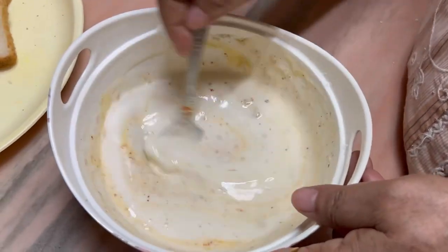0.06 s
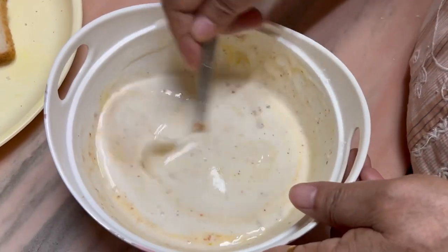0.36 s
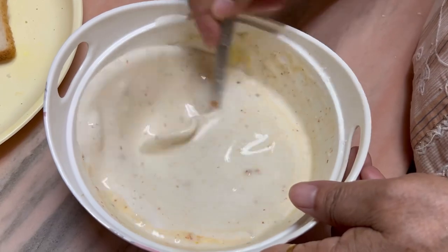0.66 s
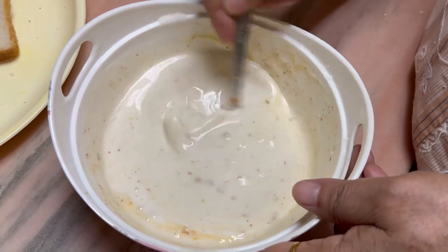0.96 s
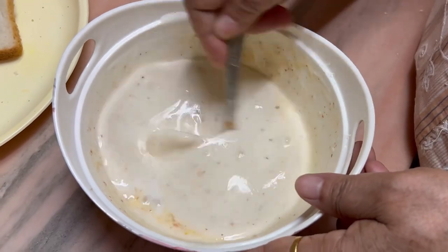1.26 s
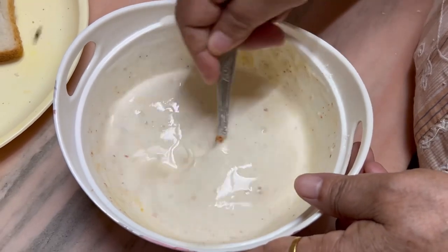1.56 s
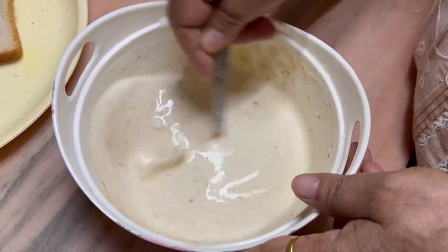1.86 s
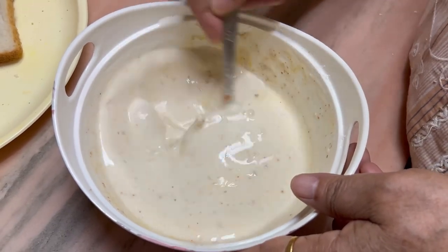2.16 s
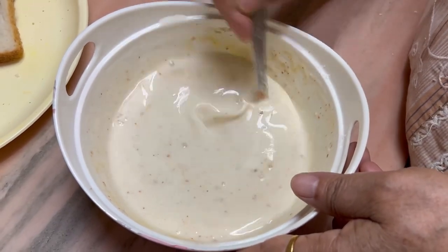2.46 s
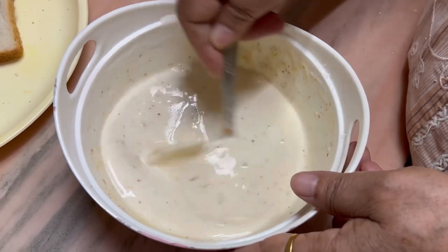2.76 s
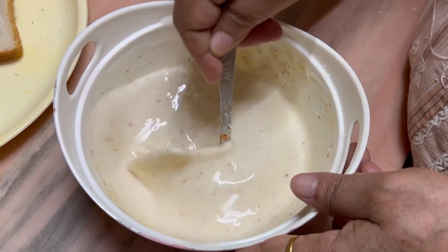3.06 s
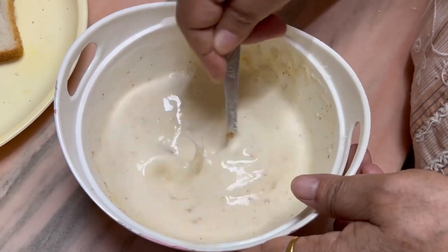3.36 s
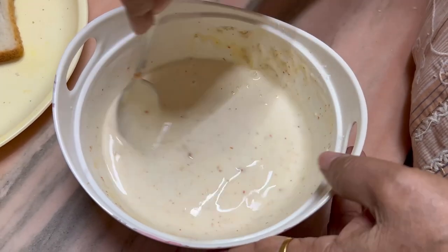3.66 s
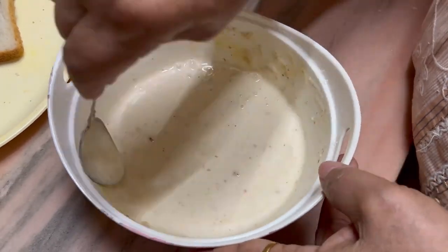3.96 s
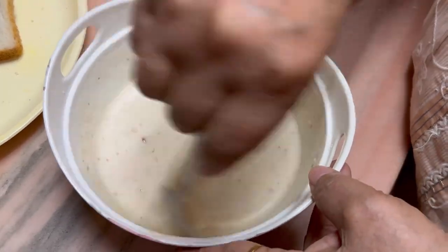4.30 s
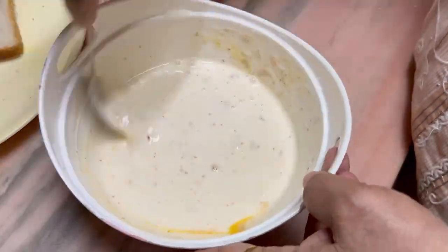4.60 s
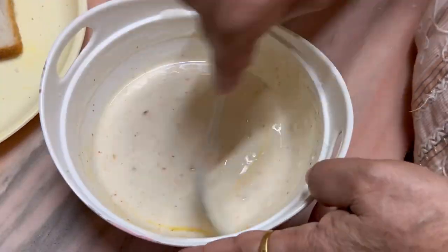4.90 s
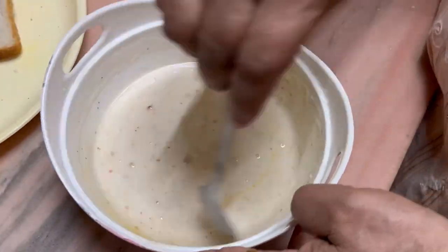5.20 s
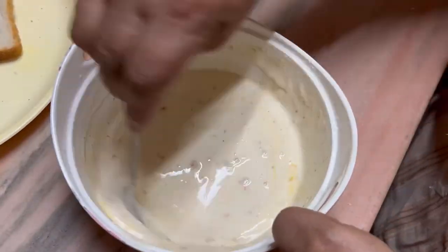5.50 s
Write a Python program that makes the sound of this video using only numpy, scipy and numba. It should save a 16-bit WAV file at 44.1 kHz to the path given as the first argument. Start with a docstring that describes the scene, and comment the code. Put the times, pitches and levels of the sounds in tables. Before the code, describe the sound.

Heard up close in a quiet room, a metal spoon clacks quickly and evenly against a plastic bowl, some strokes harder than others, while runny batter gulps and crackles stickily around it. The beating then gives way to a series of quieter, gritty scrapes along the bowl's wall, dotted with light taps and one sharp tick. A faint hum lies underneath the whole time.

```python
"""Beating batter in a plastic bowl

A quiet room, the microphone close to a hand-held bowl. A metal spoon beats thin batter, and each stroke
knocks the wall: a short clack, then the bowl's crowded, quickly damped modes. The batter gulps and smacks.
Later the spoon scrapes the sides in gritty sweeps. A faint hum lies underneath."""
import sys
import numpy as np
from scipy import signal
from scipy.fft import rfft, irfft, next_fast_len
from scipy.io import wavfile
from numba import njit

SR = 44100
rng = np.random.default_rng(int(sys.argv[2]) if len(sys.argv) > 2 else 0)


def store_pcm(level_fs):
    """Save levels as 16-bit WAV."""
    pcm = np.round(np.clip(level_fs, -1, 1) * 32767).astype(np.int16)
    wavfile.write(sys.argv[1], SR, np.atleast_2d(pcm).T)


N = 253134
TIME = np.arange(N) / SR
RING_TIME = TIME[:SR // 3]  # time axis of one short event

# Spoon on bowl, about seven beats a second, some touching twice. Columns: t/s, relative ring level/dB,
# bare-metal treble against the ring/dB, relative clack level/dB, contact f/Hz, strongest wall mode f/Hz
KNOCKS = [(0.098, -77, -15, -67, 2590, 1410), (0.122, -67, -24, -82, 1240, 1206),
          (0.264, -47.5, -33, -69, 1750, 1220), (0.411, -71.5, -40, -54.5, 1340, 1390),
          (0.553, -40, -13, -48, 1540, 1300), (0.692, -41, -10, -34.5, 1700, 1100),
          (0.844, -44.5, -17, -71, 2040, 1110), (0.871, -55, -14.5, -33, 3000, 1110),
          (0.986, -40.5, -21, -32, 2370, 1390), (1.135, -38, -14.5, -43, 1850, 1290),
          (1.288, -41.5, -13, -58, 1500, 1290), (1.341, -46, -17, -42.5, 1790, 1210),
          (1.461, -54.5, -6.5, -47.5, 1410, 1430), (1.48, -39.5, -16, -26.5, 1250, 1130),
          (1.619, -48, -19, -55, 2335, 1100), (1.723, -42.5, -2.5, -35.5, 1760, 1600),
          (1.752, -41, -10.5, -30, 1530, 1060), (1.897, -48.5, -25, -56, 1130, 1136),
          (2.038, -59, -7.5, -60, 2850, 1420), (2.063, -53, -15.5, -36.5, 1640, 1590),
          (2.099, -45.5, -3.5, -32, 2080, 1410), (2.194, -45.5, -16.5, -35, 2353, 1580),
          (2.347, -39, -23, -28, 2252, 1130), (2.404, -45.5, -6.5, -34.5, 2400, 1490),
          (2.528, -35.5, -1.5, -28.5, 3100, 1490), (2.651, -46, -11.5, -62, 1270, 1410),
          (2.684, -38.5, -10, -22.5, 2000, 1160), (2.795, -39, -13.5, -39, 1957, 1230),
          (2.949, -45.5, -12.5, -39.5, 1900, 1210), (3.091, -43.5, -8.5, -65, 1800, 1230),
          (3.239, -47, -14.5, -45.5, 1400, 1200), (3.393, -43, -13, -34.5, 1960, 1230),
          (3.539, -34.5, -11.5, -27, 2047, 1192), (3.771, -56, -9.5, -50, 2550, 1570),
          (4.006, -54, -5, -57, 2510, 1140), (4.153, -56.5, -20, -49.5, 2150, 1280),
          (5.715, -55, -6.5, -64, 2590, 1410)]
# Spectrum of the struck bowl: f/Hz, level/dB
BOWL_SPECTRUM = [(250, -39), (450, -30), (720, -22.5), (950, -11), (1120, -3.5), (1500, -6), (2000, -2),
                 (2950, -5), (3400, -14), (4500, -19.5), (7300, -19.5), (10500, -32), (13500, -41.5),
                 (16000, -60)]
# Spectrum of the scraping edge and the crackling batter: f/Hz, level/dB
GRIT_SPECTRUM = [(1500, -48.5), (3400, -16.5), (4500, -6.5), (5600, -3.5), (7500, 0), (9000, -3.5),
                 (12000, -5), (14000, -14), (16000, -35.5)]


def undb(db):
    """Decibels to amplitude."""
    return 10 ** (np.asarray(db) / 20)


def unit(x):
    """Scale to rms 1."""
    return x / np.sqrt(np.mean(x ** 2) + 1e-30)


def add(out, at_s, x):
    """Mix x into out from at_s on."""
    i = max(int(at_s * SR), 0)
    out[i:i + len(x)] += x[:max(N - i, 0)]


def shape(x, gain):
    """Filter by a gain that is a function of frequency."""
    return irfft(rfft(x) * gain(np.fft.rfftfreq(len(x), 1 / SR) + 1), len(x))


def noise(gain, samples=len(RING_TIME)):
    """White noise filtered by gain(f)."""
    return shape(rng.standard_normal(samples), gain)


def colour(hz, spectrum):
    """Gain at hz of a spectrum given as f/Hz, level/dB."""
    f, db = np.transpose(spectrum)
    return undb(np.interp(np.log(hz), np.log(f), db))


def drift(rate_hz):
    """Smooth random drift, spread near 1."""
    knots = rng.standard_normal(4096)
    return np.interp(TIME * rate_hz, np.arange(len(knots)), knots)


def fade(t60, t=RING_TIME):
    """Exponential decay, 60 dB in t60 seconds."""
    return np.exp(-np.log(1000) * t / t60)


@njit
def resonate(x, hz, width_hz):
    """State-variable band-pass with a moving centre."""
    y = np.empty(len(x))
    band_state, low_state = 0., 0.
    for i in range(len(x)):
        g = np.tan(np.pi * hz[i] / SR)
        damping = width_hz / hz[i]
        band = (band_state + g * (x[i] - low_state)) / (1 + g * (g + damping))
        band_state = 2 * band - band_state
        low_state += 2 * g * band
        y[i] = damping * band
    return y


def room_tone(waver_db=2, hum_db=-1):
    """Low room noise and a wavering hum, perhaps a fan."""
    # Spectrum of the room noise: f/Hz, level/dB
    air_spectrum = [(20, -6), (40, -3), (65, 4), (110, -6), (200, -8.5), (350, -14), (580, -9.5),
                    (1000, -16), (2200, -19), (4000, -32), (8000, -36.5), (16000, -50.5)]
    # Course of noise and hum together: t/s, level/dB
    levels = [(0, -74), (.6, -69.5), (3.6, -68.5), (4.3, -70), (4.6, -78), (5.74, -76)]
    # Partials of the hum: f/Hz, relative level/dB
    partials = [(68.5, -9), (140, -6), (290, -12)]
    level_db = np.interp(TIME, *np.transpose(levels))
    air = unit(noise(lambda f: colour(f, air_spectrum), N)) * undb(drift(2.2))
    hum = sum(undb(db + waver_db * drift(4.6)) * np.sin(2 * np.pi * hz * TIME + .26 * drift(26))
              for hz, db in partials)
    return undb(level_db) * (air + undb(hum_db) * np.sqrt(2) * hum)


def reflections(x, tail_db=-25, t60=.16, echo_db=-7, echo_s=.0145, echo_top_hz=3000):
    """One dull reflection from a nearby wall and a weak tail."""
    t = TIME[:SR]
    tail = noise(lambda f: 1 / np.hypot(1, (f / 4500) ** 2), SR) * fade(t60, t) * (t > echo_s)
    out = undb(tail_db) * signal.fftconvolve(x, tail / np.linalg.norm(tail))[:N]
    echo = shape(x, lambda f: 1 / np.hypot(1, (f / echo_top_hz) ** 2))
    add(out, echo_s, undb(echo_db) * echo)
    return out


def bump(at_s=4.744, width_s=.035, level_db=-60, top_hz=105):
    """The bowl shifts in the hand with a soft thud as the spoon turns."""
    thud = noise(lambda f: (f > 50) / (1 + (f / top_hz) ** 3), N)
    push = np.exp(-((TIME - at_s) / width_s) ** 2)
    return undb(level_db) * unit(thud * push) * np.sqrt(np.mean(push ** 2))


def grit(per_s, spread_db):
    """Dense micro-slips of uneven size."""
    size = undb(spread_db * np.minimum(rng.exponential(size=N), 5))
    return unit((rng.random(N) < per_s / SR) * size * rng.standard_normal(N))


def batter_crackle(level_db=-66, lag_s=.029, spread_s=.015, low_cut_hz=8000, force_share=.41):
    """Batter closes behind the spoon with a fine sticky crackle, more after hard strokes."""
    wakes = [np.exp(-((TIME - at_s - lag_s) / spread_s) ** 2) * undb(force_share * (ring_db + treble_db))
             for at_s, ring_db, treble_db, *_ in KNOCKS]
    wake = np.max(wakes, axis=0)
    crackle = shape(grit(per_s=5000, spread_db=2.5),
                    lambda f: colour(f, GRIT_SPECTRUM) / np.hypot(1, (low_cut_hz / f) ** 2))
    return undb(level_db) * wake / wake.max() * unit(crackle)


def gulps_and_drags(log_width=.29, t60=.13, build_s=.004):
    """Pockets of air close under the folding batter and ring dully; brief drags of the spoon along the wall
    ring the bowl the same way."""
    # Air pockets and brief spoon drags: t/s, f/Hz, level/dB
    events = [(0.149, 1330, -56), (0.56, 910, -51), (0.7, 885, -51), (1.345, 545, -53.5),
              (1.484, 557, -50), (1.76, 650, -70), (2.105, 537, -61), (2.543, 320, -53.5),
              (2.691, 545, -47.5), (3.113, 2800, -46), (3.258, 360, -61.5), (3.286, 1240, -51),
              (3.337, 1370, -59), (4.016, 700, -52), (4.13, 490, -59)]
    out = np.zeros(N)
    for at_s, hz, db in events:
        burst = unit(noise(lambda f: 1 / (1 + (np.log(f / hz) / log_width) ** 2)))
        add(out, at_s, undb(db) * burst * fade(t60) * (1 - np.exp(-RING_TIME / build_s)))
    return out


def ticks(rustle_t60=.11, ring_cycles=7):
    """The spoon's edge ticks and parting batter smacks: tiny snaps, each with a slight wet rustle."""
    # Snaps: t/s, peak level/dB, f/Hz, rustle level/dB
    snaps = [(0.615, -43.5, 2560, -68), (0.908, -44, 3470, -70), (1.196, -45, 6000, -70),
             (1.363, -39, 2320, -86), (1.453, -45.5, 9000, -65), (1.622, -44, 11500, -60.5),
             (1.7251, -17.5, 7440, -54), (2.252, -53, 6950, -64.5), (2.367, -62, 11000, -64.5),
             (2.657, -43, 11500, -54), (3.402, -35, 10400, -53), (3.546, -30, 11000, -49),
             (3.870, -45, 7440, -60.5), (4.01, -34, 6900, -49), (4.050, -37, 7340, -62),
             (4.155, -37, 6350, -53.5), (4.252, -52, 6900, -64.5), (4.353, -57.5, 5160, -52),
             (4.437, -49.5, 6170, -58.5), (4.709, -43, 4310, -69), (4.74, -20, 4250, -54),
             (5.188, -59, 9000, -66)]
    out = np.zeros(N)
    for at_s, snap_db, hz, rustle_db in snaps:
        snap = clack(hz, t60=ring_cycles / hz, crack=.075, crack_t60=.01)
        rustle = unit(noise(lambda f: colour(f, GRIT_SPECTRUM))) * fade(rustle_t60)
        add(out, at_s, undb(snap_db) * snap / np.abs(snap).max() + undb(rustle_db) * rustle)
    return out


def rub(spectrum, flicker_db=3.8):
    """Friction of dense micro-slips; each band swells and sinks as the contact shifts."""
    slips = grit(per_s=16000, spread_db=2.2)
    edges_hz = np.r_[0, np.geomspace(400, 16000, 48)]
    size = next_fast_len(N, True)
    f = np.fft.rfftfreq(size, 1 / SR) + 1
    coloured = rfft(slips, size) * colour(f, spectrum)
    out = np.zeros(N)
    for lo, hi in zip(edges_hz, edges_hz[1:]):
        band = irfft(coloured * (f > lo) * (f <= hi), size)[:N]
        out += band * undb(flicker_db * drift(40))
    return unit(out)


def swell(since, rise, fall, drop_db=24.5, roundness=1.33):
    """Pressure of a stroke: it builds to 1 and eases off, drop_db down after one fall time."""
    away = np.minimum(np.maximum(-since / rise, since / fall), 10)
    return undb(-drop_db * away ** roundness)


def scrapes(wall_linger=1.68, sag_octaves_per_s=.7, upper_edge_hz=6800, judder_db=1.7, catch_db=2):
    """The spoon's edge slips and catches along the wall; the firmest stroke leads the resonances."""
    # Strokes: firmest pressure t/s, rise/s, edge fall/s, edge level/dB, wall level/dB,
    # wall resonance f/Hz, lower edge resonance f/Hz
    strokes = [(3.899, 0.033, 0.046, -54.5, -73, 1970, 5700), (4.14, 0.038, .06, -53, -67, 2140, 4970),
               (4.366, 0.057, 0.066, -52, -67, 2010, 4860), (4.731, 0.059, 0.061, -49.5, -56.5, 2670, 4240),
               (4.893, 0.1, 0.077, -61.5, -63, 2400, 4670), (4.966, 0.058, 0.092, -62.5, -66, 2260, 4470),
               (5.219, 0.026, 0.18, -59, -70, 2440, 5000), (5.288, 0.029, 0.073, -52.5, -55, 1905, 4390),
               (5.361, .03, 0.029, -66, -59, 2210, 4700), (5.476, 0.057, 0.084, -54.5, -54.5, 1850, 4360),
               (5.562, 0.038, .075, -72.5, -61, 1440, 4860), (5.727, 0.06, 0.045, -62.5, -61, 1974, 4400)]
    # Spectrum of the rubbed wall: f/Hz, level/dB
    wall_spectrum = [(150, -6.5), (400, -5.5), (580, -1.5), (850, -6), (1200, -6), (1600, -4), (2300, -5),
                     (2900, -15.5), (3400, -19), (5000, -41.5)]
    at_s, rise, fall, edge_db, wall_db, bowl_hz, edge_hz = np.transpose(strokes)[:, :, None]
    since = TIME - at_s
    on_edge = undb(edge_db) * swell(since, rise, fall)
    on_wall = undb(wall_db) * swell(since, rise, fall * wall_linger)
    # resonances sink as more of the spoon touches
    sag = 2 ** (-sag_octaves_per_s * np.clip(since, -rise, fall))
    wobble = 1 + .025 * drift(35)
    lower_hz = wobble * np.average(edge_hz * sag, axis=0, weights=on_edge ** 2 + 1e-30)
    wall_hz = np.exp(.059 * drift(45)) * np.average(bowl_hz * sag, axis=0, weights=on_wall ** 2 + 1e-30)
    edge, wall = rub(GRIT_SPECTRUM), rub(wall_spectrum)
    lower_ring = unit(resonate(edge, lower_hz, width_hz=350.))
    upper_ring = unit(resonate(edge, upper_edge_hz * wobble, width_hz=700.))
    wall_ring = unit(resonate(wall, wall_hz, width_hz=220.))
    edge = unit(edge + .79 * lower_ring + .28 * upper_ring)
    wall = unit(undb(catch_db * drift(50)) * (wall + 1.48 * wall_ring))
    return undb(judder_db * drift(100)) * (on_edge.max(axis=0) * edge + on_wall.max(axis=0) * wall)


def hardness(hz, top_db, neutral_db=-2, knee_hz=5000):
    """A harder contact lifts the treble above the knee."""
    return undb((top_db - neutral_db) * np.clip(np.log2(hz / knee_hz), 0, 1))


def clack(hz, t60, crack, crack_t60, top_db=0, edge_top_hz=11000):
    """First contact: a few cycles of one resonance and a crack of the hard edge."""
    def gain(f):
        bright = colour(f, BOWL_SPECTRUM) * np.sqrt(f) * hardness(f, top_db)
        return bright / np.hypot(1, (f / edge_top_hz) ** 3)
    tone = np.sin(2 * np.pi * hz * RING_TIME) * fade(t60)
    click = tone + crack * unit(noise(gain)) * fade(crack_t60)
    # the clack starts softly over about one cycle and carries little bass
    click *= 1 - np.exp(-(2 * hz * RING_TIME) ** 2)
    return signal.sosfilt(signal.butter(2, 800, "high", fs=SR, output="sos"), click)


def bowl_modes(lo_hz, hi_hz, t60, build_s, mode_hz, top_db, hump_log_width=.17, mode_width_hz=26):
    """Crowded modes with random phases; the place of the blow favours one mode and its neighbours."""
    def gain(f):
        hump = 1 + undb(7) / (1 + (np.log(f / mode_hz) / hump_log_width) ** 2)
        mode = 1 + undb(8) / (1 + ((f - mode_hz) / mode_width_hz) ** 2) / 2
        return colour(f, BOWL_SPECTRUM) * hump * mode * hardness(f, top_db) * (f > lo_hz) * (f < hi_hz)
    envelope = fade(t60) * (1 - np.exp(-RING_TIME / build_s))
    return unit(noise(gain) * envelope) * np.sqrt(np.mean(envelope ** 2))


def knocks(family_gains_db=(8.6, 8.3, 8), contact_s=.0012, spoon_hz=4500, lean_db_per_octave=11.5):
    """Each blow of the spoon clacks and sets three families of bowl modes ringing."""
    # Low, middle and high modes of the bowl: lowest f/Hz, highest f/Hz, t60/s, build-up/s
    families = [(198.7, 1600, 0.13, 0.0038), (1613, 3400, 0.096, 0.0027), (3330, 16000, 0.12, 0.00083)]
    out = np.zeros(N)
    for at_s, ring_db, treble_db, clack_db, contact_hz, wall_hz in KNOCKS:
        # a higher-pitched contact favours the middle modes over the low ones
        lean_db = lean_db_per_octave * np.log2(contact_hz / 1800)
        top_db = treble_db + 8  # the top octave follows the bare-metal treble
        favoured_hz = (wall_hz, contact_hz, spoon_hz)
        shares_db = (-lean_db / 2, lean_db / 2, treble_db)
        for family, hz, share_db, gain_db in zip(families, favoured_hz, shares_db, family_gains_db):
            ring = bowl_modes(*family, hz, top_db)
            add(out, at_s + contact_s / 2, undb(ring_db + share_db + gain_db) * ring)
        # a film of batter cushions the blow and takes the crack away
        bare = min(undb(treble_db - lean_db / 2), 1)
        click = clack(contact_hz, t60=.016, crack=1.14 * bare, crack_t60=.017, top_db=top_db)
        click /= np.sqrt(np.mean(click[:SR // 250] ** 2))  # rms 1 over the first 4 ms
        add(out, at_s + contact_s, undb(clack_db + .5) * click)
    return out


def scene():
    """The bowl sounds into the room; ticks and crackle reach the mono microphone only directly."""
    bowl = knocks() + gulps_and_drags() + scrapes() + bump()
    return (bowl + reflections(bowl) + ticks() + batter_crackle() + room_tone())[None]


def record(dry):
    """The recorder cuts steeply above 15.8 kHz."""
    return signal.sosfilt(signal.ellip(8, .2, 70, 15800, fs=SR, output="sos"), dry)


dry = scene()
out = record(dry)
store_pcm(out)
```